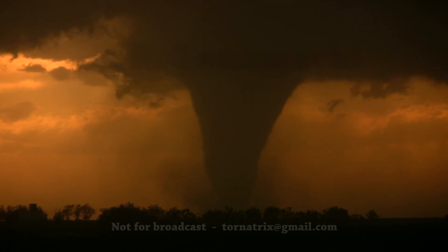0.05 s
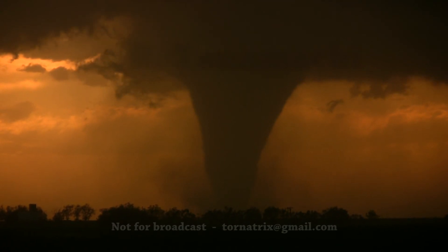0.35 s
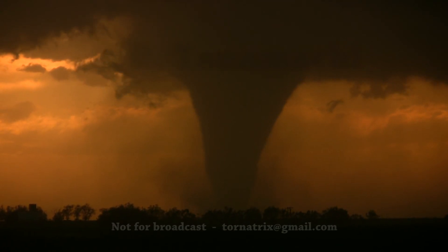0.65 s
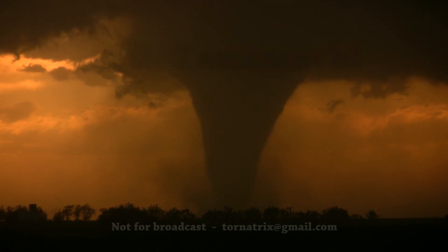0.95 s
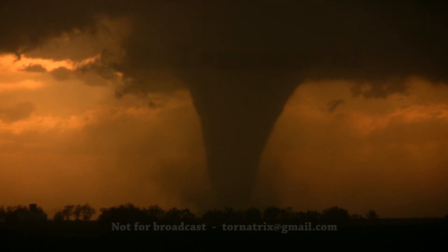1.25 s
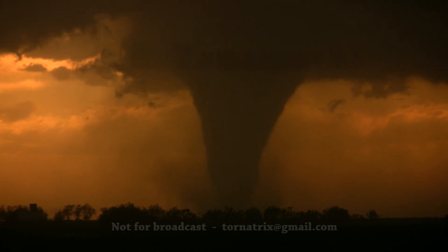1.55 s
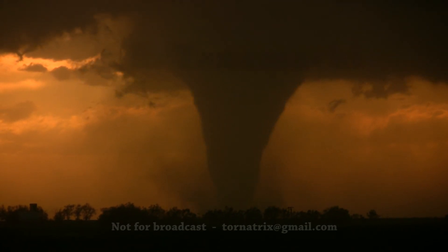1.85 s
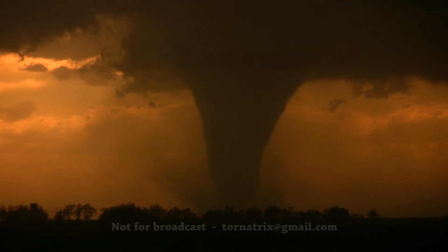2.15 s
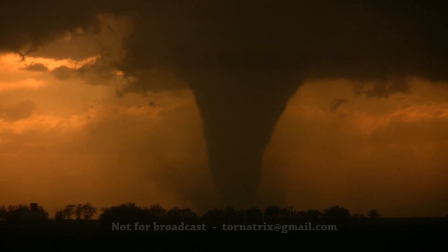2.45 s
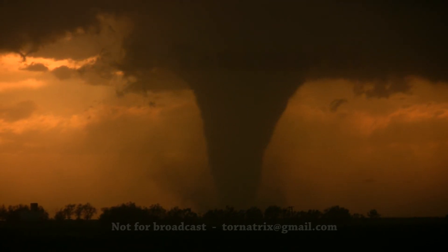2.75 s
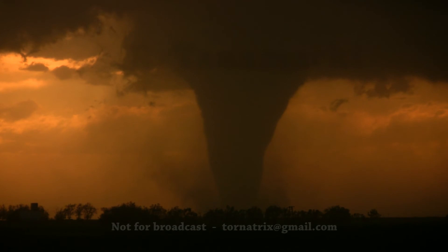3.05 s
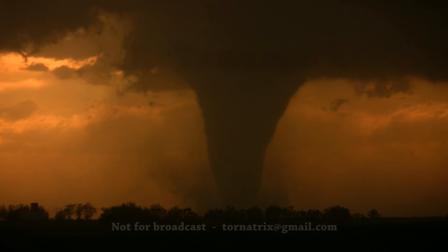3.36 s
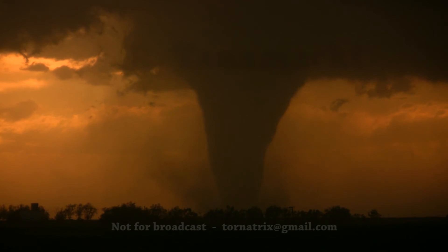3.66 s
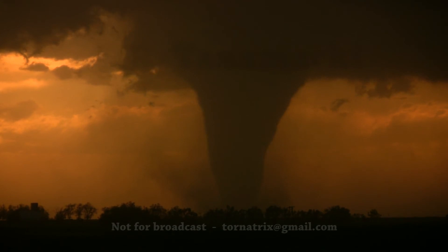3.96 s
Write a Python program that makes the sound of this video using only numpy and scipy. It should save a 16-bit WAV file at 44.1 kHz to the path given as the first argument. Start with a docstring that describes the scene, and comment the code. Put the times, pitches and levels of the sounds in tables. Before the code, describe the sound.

Gusty wind thumping on the microphone, with a far storm roaring and trees rushing.

```python
"""Open farmland under a distant tornado. From the start the storm roars, wind rushes through far trees,
dry grass hisses and the camera whines very faintly, while gusts buffet its microphone with slow pressure
swings and a fluttering rumble. At 0.5 s the first hard eddy thumps; grass rustles follow, and from 1 s
small taps and ticks stand out close by, perhaps stray drops. The roar swells just after 2 s; at 2.56 s the
hardest gust hits with a dull knock, like the microphone overloading. One last eddy lands at 3.5 s."""
import sys
import numpy as np
from scipy import signal
from scipy.fft import rfft, irfft
from scipy.io import wavfile
from scipy.ndimage import uniform_filter1d

SR = 44100
rng = np.random.default_rng(int(sys.argv[2]) if len(sys.argv) > 2 else 0)


def transcribe(signal):
    """Save signal, clipped to [-1, 1], as a 16-bit WAV file at the path in sys.argv[1]."""
    frames = np.atleast_2d(signal).T
    limited = np.clip(frames, -1, 1)
    pcm = np.round(limited * 32767).astype(np.int16)
    wavfile.write(sys.argv[1], SR, pcm)


N = 176400  # 4 s


def undb(db):
    """Decibels to gain."""
    return 10 ** (np.asarray(db) / 20)


def unit(x):
    """Scale to rms 1."""
    return x / np.sqrt(np.mean(x ** 2) + 1e-20)


def curve(rows):
    """A fader ride: (t, value) breakpoints joined by straight lines."""
    return np.interp(np.arange(N) / SR, *np.array(rows, float).T)


def noise(colour):
    """Noise of rms 1, shaped by an EQ of (f, level) points and rolled off beyond its ends."""
    hz, db = np.array(colour, float).T
    f = np.maximum(np.arange(N // 2 + 1) * SR / N, 1e-3)
    rolloff = (np.minimum(f / hz[0], 1) * np.minimum(hz[-1] / f, 1)) ** 2
    eq = undb(np.interp(np.log(f), np.log(hz), db))
    return unit(irfft(rfft(rng.standard_normal(N)) * rolloff * eq, N))


def drift(rate_hz):
    """Smooth random modulation of rms 1."""
    hold = max(int(SR / rate_hz), 2)
    steps = rng.standard_normal(2048)[np.arange(N) // hold % 2048]
    return unit(uniform_filter1d(uniform_filter1d(steps, hold), hold))


def steady(x, span_s):
    """A leveller: irons out chance swells longer than the span, so the fader ride sets the level."""
    power = uniform_filter1d(np.abs(signal.hilbert(x)) ** 2, max(int(span_s * SR), 2))
    return unit(x / np.sqrt(power + 1e-9))


def add(out, at, sound):
    """Mix a sound in at a time in seconds."""
    start = int(np.clip(at * SR, 0, N - 1))
    out[start:start + len(sound)] += sound[:N - start]


# fader ride of the roar: t/s, level/dB
ROAR_RIDE = [(0, -32), (.6, -33.5), (1.0, -32.5), (1.4, -33), (1.9, -26), (2.15, -23.5), (2.4, -26.5),
             (2.8, -29), (3.25, -30.5), (3.7, -31.5), (4, -29)]
# its dark EQ: f/Hz, level/dB
ROAR_EQ = [(80, -34), (110, -34), (160, -1.5), (215, -0.5), (290, -3), (400, -7.5), (550, -16.5),
           (800, -27), (1400, -41.5), (4000, -41.5)]

def tornado_roar():
    """The far storm: a low bed that wavers a little and swells midway."""
    return steady(noise(ROAR_EQ), span_s=0.11) * undb(curve(ROAR_RIDE) + .8 * drift(12))


# fader ride of the trees: t/s, level/dB
TREES_RIDE = [(0, -39.5), (.6, -39), (1.2, -38.5), (1.75, -38.5), (2.7, -38.5), (2.95, -37), (3.3, -40),
              (3.5, -39), (4, -39)]
# their mid-heavy EQ: f/Hz, level/dB
TREES_EQ = [(150, -27.5), (500, 10), (900, 5), (1400, 3), (2000, 1), (2800, 0.5), (3200, -2.5), (3600, -7),
            (4000, -9), (4500, -5), (5100, -6), (5900, -10), (6600, -16), (7100, -14), (7700, -11),
            (8500, -20.5), (10000, -30), (15000, -44)]

def tree_rush():
    """Wind through far trees: a broad wash with a slight shiver."""
    return noise(TREES_EQ) * undb(curve(TREES_RIDE) + .3 * drift(14))


# fader ride of the pressure swings: t/s, relative level/dB
SWING_RIDE = [(0.0, -24.5), (0.13, -14), (0.22, -33), (0.32, -8), (0.39, -12.5), (0.43, -24), (0.5, -13.5),
              (0.56, -16), (0.61, -15.5), (1.08, -16.5), (1.2, -7), (1.3, -24.5), (1.47, -18), (1.5, -13.5),
              (1.66, -13.5), (2.1, -21), (2.13, -17), (2.33, -18.5), (2.48, -6.5), (2.54, -15.5),
              (2.58, -7), (2.62, -18), (2.66, -16.5), (2.87, -24), (2.99, -7), (3.09, -32), (3.14, -19),
              (3.74, -14.5), (3.78, -10.5), (4.0, -18)]
# their sub-bass EQ: f/Hz, level/dB
SWING_EQ = [(4, -34), (11, 16), (25, 16), (40, -2.5), (50, -7.5), (65, -31)]

def pressure_swings():
    """Slow turbulence pushes and pulls on the microphone: the sub layer."""
    swings = steady(noise(SWING_EQ), span_s=0.092) * undb(curve(SWING_RIDE) + 0.5)
    lowpass = signal.butter(6, 59.5, fs=SR, output="sos")
    return signal.sosfiltfilt(lowpass, swings)


# gust strength at the microphone: t/s, relative level/dB
GUST_RIDE = [(0.0, -34), (0.02, -21), (0.08, -39), (0.37, -26.5), (0.41, -35), (0.44, -35), (0.48, -28),
             (0.51, -26.5), (0.61, -31.5), (0.69, -14.5), (0.81, -29.5), (0.87, -14.5), (0.96, -23),
             (1.04, -15.5), (1.08, -28.5), (1.14, -15), (1.2, -25), (1.37, -32), (1.65, -14), (1.68, -12.5),
             (1.78, -17.5), (1.8, -19), (1.96, -26), (2.13, -18), (2.15, -27.5), (2.36, -19), (2.44, -31),
             (2.47, -14), (2.53, -18), (2.55, -6), (2.62, -15.5), (2.65, -24.5), (2.75, -16), (2.95, -32),
             (2.99, -23), (3.13, -34), (3.2, -28.5), (3.39, -25.5), (3.41, -14.5), (3.55, -8),
             (3.59, -24.5), (3.9, -21), (3.93, -16), (4.0, -18.5)]
# EQs of the rumble, the flutter and the rumble's stereo side: f/Hz, level/dB
RUMBLE_EQ = [(40, -21), (56, -4), (72, 2), (145, 1), (200, -5), (300, -24.5), (500, -38), (1000, -53),
             (3000, -66)]
FLUTTER_EQ = [(120, -23), (230, 5.5), (380, -2), (550, -15.5), (900, -20), (2000, -52.5), (6000, -67)]
SIDE_RUMBLE_EQ = [(20, 10), (60, 7), (130, 9), (250, -10), (500, -17), (1000, -53.5), (2000, -51),
                  (4000, -57)]

def buffeting():
    """Gusts on the microphone drive a rumble and a brighter flutter; returns mid and side."""
    gust_db = curve(GUST_RIDE)
    rumble = steady(noise(RUMBLE_EQ), span_s=0.049) * undb(gust_db - 3.5)
    flutter_db = -37 + 0.8 * (gust_db + 25.5)  # moves 0.8 dB per dB of gust
    flutter = noise(FLUTTER_EQ) * undb(flutter_db + 2.85 * drift(40))
    side_rumble = noise(SIDE_RUMBLE_EQ) * undb(gust_db - 26.5)
    return rumble + flutter, side_rumble


# fader ride of the grass hiss: t/s, level/dB
HISS_RIDE = [(0, -58), (.6, -57), (.9, -54.5), (1.15, -56), (1.7, -55.5), (2.1, -58.5), (2.6, -58.5),
             (2.85, -56), (3.4, -57), (4, -57)]
# its bright EQ: f/Hz, level/dB
HISS_EQ = [(3000, -23), (6000, -4), (9000, -0.5), (11000, -3), (13000, -6.5), (16000, -8.5)]

def grass_hiss():
    """Dry grass gives a fine hiss that swells with the breeze."""
    return noise(HISS_EQ) * undb(curve(HISS_RIDE) + .7 * drift(43))


# EQ of the hiss on the stereo side: f/Hz, level/dB
AIR_EQ = [(2000, -32), (6000, -20), (8000, -2), (12000, 6.5), (16000, 2.5)]

def wide_air():
    """A trace of steady hiss that widens the top end."""
    return undb(-68) * noise(AIR_EQ)


# tones of the whine: f/Hz, rms level/dB
WHINE_TONES = [(5395, -67.5), (5695, -75)]

def camera_whine():
    """The camera's own faint whine: two thin sines, each drifting slightly in pitch."""
    out = np.zeros(N)
    for hz, db in WHINE_TONES:
        phase = 2 * np.pi * np.cumsum(hz + 1.8 * drift(4.06)) / SR
        out += np.sqrt(2) * undb(db) * np.sin(phase)
    return out


# hard eddies on the microphone: t/s, peak level/dB, f/Hz
EDDY_HITS = [(.481, -5, 117), (0.682, -6.5, 125), (0.906, -12.5, 248), (1.63, -4, 89), (1.775, -6.5, 106),
             (2.559, 5.5, 116), (2.607, 1.5, 130), (3.545, -1.5, 131)]

def eddies():
    """Each eddy is a thump: a brief suction between two pushes."""
    t, out = np.arange(N) / SR, np.zeros(N)
    for at, db, hz in EDDY_HITS:
        phase_squared = (np.pi * hz * (t - at)) ** 2
        out -= undb(db) * (1 - 2 * phase_squared) * np.exp(-phase_squared)
    return out


# rustle cues: t/s, level/dB, centre f/Hz, half-length/s, half-width/octaves
RUSTLE_CUES = [(.660, -47, 11000, .013, 1.7), (0.682, -46, 11000, .010, 1.5), (1.147, -55, 12000, .015, .8),
               (1.393, -43, 1490, 0.068, .3), (3.832, -58, 9400, .025, .2), (3.9, -53, 10000, .014, .17)]

def grass_rustles():
    """Dry grass stirs: short puffs of band noise that fade in and out."""
    t, out = np.arange(N) / SR, np.zeros(N)
    for at, db, hz, half_length, octaves in RUSTLE_CUES:
        edge = 2 ** octaves
        eq = [(hz / edge ** 2, -30), (hz / edge, -9), (hz, 0), (hz * edge, -9), (hz * edge ** 2, -30)]
        fade = np.exp(-2 * ((t - at) / half_length) ** 2)
        out += undb(db) * noise(eq) * fade
    return out


def blip(hz, attack_cycles):
    """One tiny tap: a sine whose envelope peaks after the given cycles and dies quickly."""
    cycles = hz * np.arange(SR // 20) / SR
    age = cycles / attack_cycles
    return age * np.exp(1 - age) * np.sin(2 * np.pi * cycles)


# dull taps and fine ticks: t/s, envelope peak level/dB, f/Hz, attack/cycles
TAP_HITS = [(1.2384, -23, 810, 0.43), (1.3200, -20.5, 910, 0.39), (1.3643, -20.5, 1070, .6),
            (1.7305, -21.5, 1070, .6), (1.8267, -21, 970, 0.54), (1.8448, -15.5, 625, 0.36),
            (2.5603, -15, 705, 0.69), (2.6485, -20, 1960, 0.55), (3.0614, -17.5, 806, 0.68),
            (1.0690, -27, 7460, 0.74), (2.3730, -26.5, 6300, 0.84), (2.7915, -34, 9450, 1.8),
            (3.182, -34, 6000, .9), (3.765, -33, 7700, 1.3)]

def taps(patter_count=36):
    """Close taps and faint patter, perhaps stray drops; the knock at 2.56 s suggests gust overload."""
    out = np.zeros(N)
    for at, db, hz, attack_cycles in TAP_HITS:
        add(out, at, undb(db) * blip(hz, attack_cycles))
    for when, softness, pitch in rng.random((patter_count, 3)):
        hz = 700 * 2 ** (4 * pitch)
        db = -34 - 3.5 * np.log2(hz / 1000) - 10 * softness  # higher ticks are quieter
        add(out, when * N / SR, undb(db) * blip(hz, attack_cycles=1))
    return out


def scene():
    """The mix: nearly all centred, with width only from the air and a little of the rumble."""
    whine = camera_whine()
    swings = pressure_swings()
    gusts, side_rumble = buffeting()
    pan = undb([[-.2], [.2]])  # wind on the microphone leans a touch right
    wind = (swings + gusts + eddies()) * pan
    side = (wide_air() + side_rumble) * np.array([[1], [-1]])
    centre = tornado_roar() + tree_rush() + grass_hiss() + whine + grass_rustles() + taps()
    return wind + centre + side


def record(dry):
    """The camera soft-clips the highest peaks and cuts the top above 15.7 kHz."""
    clipped = dry / (1 + dry ** 8) ** (1 / 8)
    high_cut = signal.ellip(10, .1, 80, 15700, fs=SR, output="sos")
    return signal.sosfilt(high_cut, clipped)


dry = scene()
out = record(dry)
transcribe(out)
```